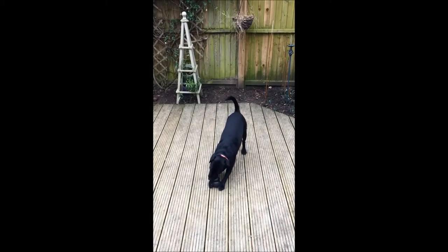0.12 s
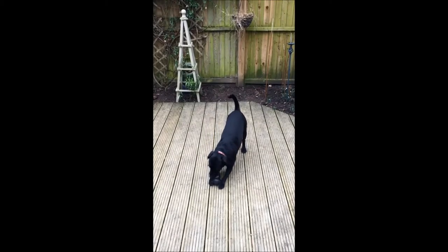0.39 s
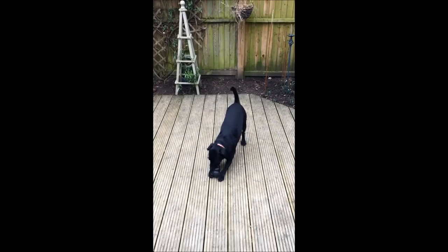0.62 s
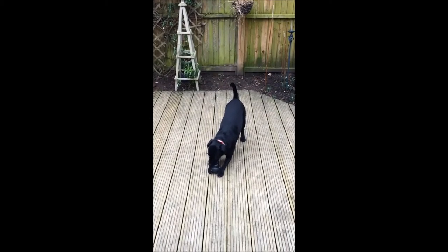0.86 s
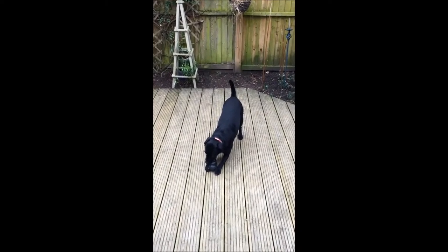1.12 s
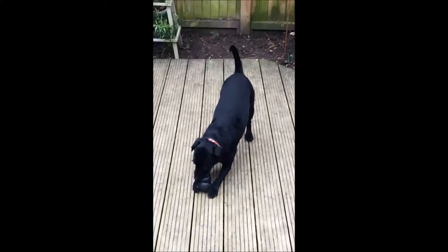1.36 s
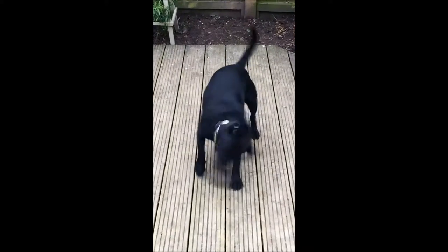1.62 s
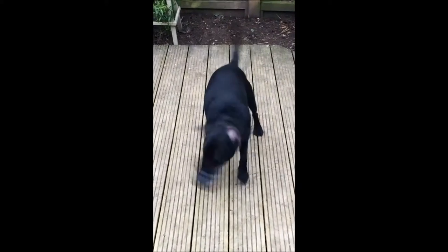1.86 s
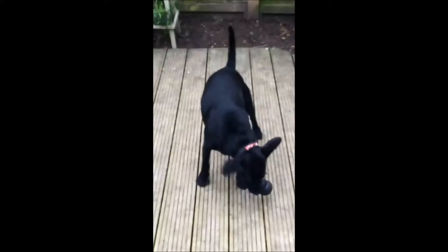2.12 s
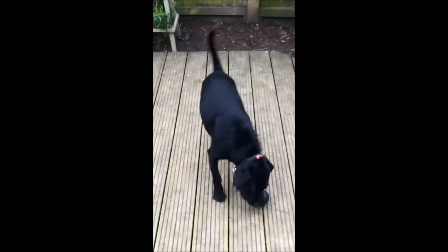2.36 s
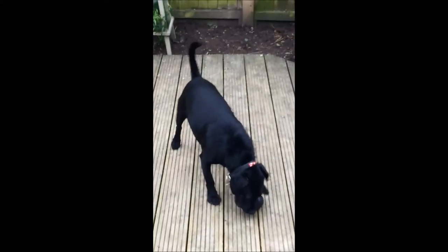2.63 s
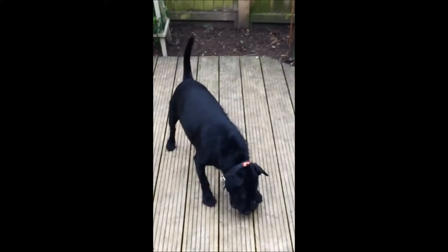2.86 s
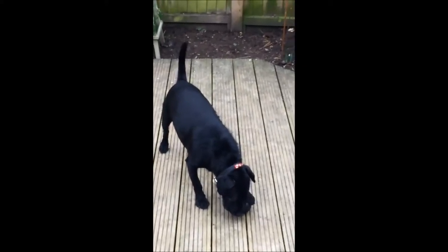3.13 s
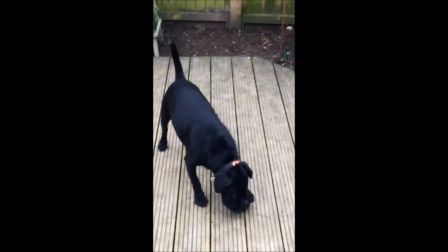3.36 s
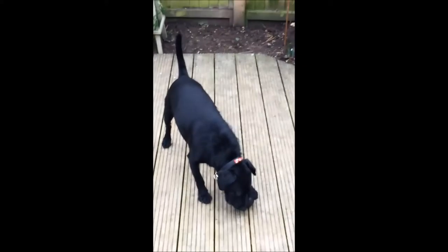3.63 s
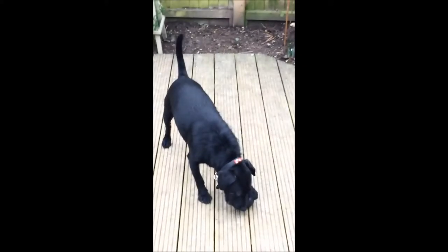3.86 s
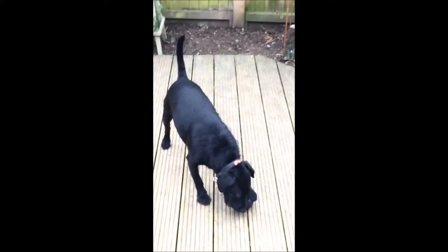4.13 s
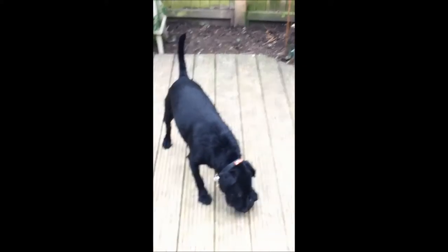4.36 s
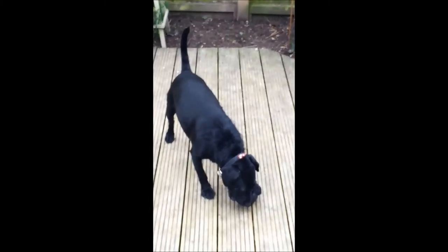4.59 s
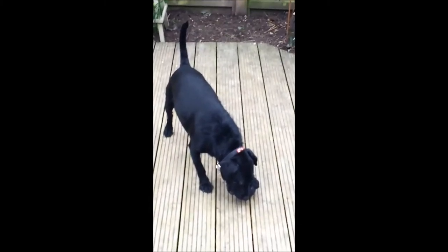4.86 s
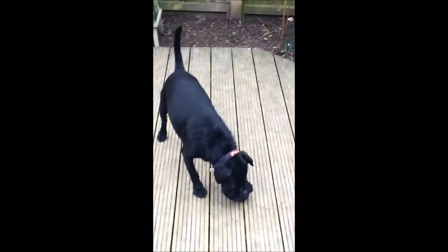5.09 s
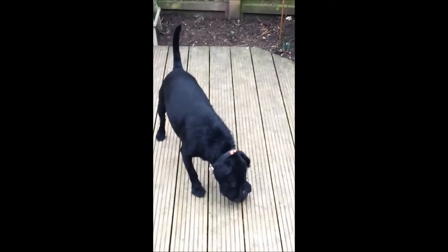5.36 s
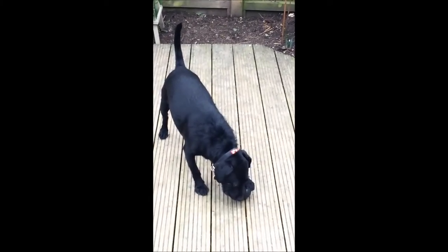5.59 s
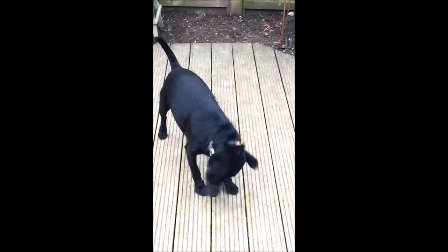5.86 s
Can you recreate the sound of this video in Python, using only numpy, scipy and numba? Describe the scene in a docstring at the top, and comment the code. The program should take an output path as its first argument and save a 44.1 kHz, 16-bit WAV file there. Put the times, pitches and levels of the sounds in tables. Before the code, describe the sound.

Outdoors, a few metres from a phone, a dog gives a quiet fluttering growl, then pauses. It shakes a toy with louder, rougher growls, rustling fur, thin tag jingle and sharp knocks on wooden boards. After a pause come two softer rattling growls, the last swelling into a harsh snarl at the end. Faint town rumble and tiny bird chirps lie underneath.

```python
"""Dog growling over a toy

A dog growls in bouts over a rubber toy on a garden deck, a few metres from a phone, and shakes it.
Uneven fold pulses and breath noise ring chest, throat, mouth and nose; a slow flutter chops them at times.
Decaying modes make the tags' jingle and board knocks; shaped noise makes fur rustle, rasps and far town
rumble; gliding tones make a short whine and small bird calls."""
import sys
import numpy as np
from scipy import signal
from scipy.fft import rfft, irfft
from scipy.io import wavfile
from scipy.ndimage import uniform_filter1d
from numba import njit

SR = 44100
rng = np.random.default_rng(int(sys.argv[2]) if len(sys.argv) > 2 else 0)


def inscribe(sig):
    """Save sig as 16-bit PCM at rate SR to the path in sys.argv[1].

    A 1-D sig is mono; a 2-D sig holds one channel per row.
    Samples are clipped to [-1, 1] before scaling.
    """
    pcm = np.round(np.clip(np.atleast_2d(sig).T, -1, 1) * 32767)
    wavfile.write(sys.argv[1], SR, pcm.astype(np.int16))


def field_ratio(decibels):
    """Amplitude ratio for a level in dB (20 dB per decade); scalars and array-likes work."""
    return 10 ** (np.asarray(decibels, dtype=float) / 20)


N = 263718
T = np.arange(N) / SR


def level(x, db):
    """Scale to an rms level."""
    return x * field_ratio(db) / np.sqrt(np.mean(x ** 2))


@njit
def svf(x, hz, width_hz):
    """State-variable band-pass with a moving centre, gain 1 there."""
    y, band_state, low_state = np.empty(len(x)), 0., 0.
    for i in range(len(x)):
        g, damping = np.tan(np.pi * hz[i] / SR), width_hz / hz[i]
        v = (band_state + g * (x[i] + 1e-18 - low_state)) / (1 + g * (g + damping))
        band_state = 2 * v - band_state
        low_state += 2 * g * v
        y[i] = damping * v
    return y


def resonance(x, hz, width_hz):
    """Band-pass with a fixed centre."""
    return svf(x, hz + 0. * T, 1. * width_hz)


def ring(x, peaks):
    """Sum of resonances with alternating sign, which keeps the valleys between them filled evenly."""
    return sum((-1) ** k * field_ratio(db) * resonance(x, hz, width_hz) for k, (hz, width_hz, db) in enumerate(peaks))


def band(x, lo_hz, hi_hz):
    """Steep band-pass."""
    return signal.sosfilt(signal.butter(3, [lo_hz, hi_hz], "bandpass", fs=SR, output="sos"), x)


def decay(x, decay_s):
    """Each impulse dies away exponentially with time constant decay_s."""
    return signal.lfilter([1], [1, -np.exp(-1 / (decay_s * SR))], x)


def clicks(seconds, sizes):
    """One-sample impulses at the given times."""
    return np.bincount((np.asarray(seconds) * SR).astype(int), sizes, N)[:N]


def walk(rate_hz):
    """Random levels held 1 / rate_hz s and slewed twice; spread about 2.3."""
    k = int(SR / rate_hz)
    steps = np.repeat(rng.standard_normal(N // k + 1), k)
    return 3.2 * uniform_filter1d(uniform_filter1d(steps, k), k)[:N]


def track(tables, silent_db=-110):
    """Columns of several bouts on the sample grid; the first is a level, silent between bouts."""
    s, *columns = np.concatenate(tables).T
    columns = [np.interp(T, s, c) for c in columns]
    sounding = sum((T >= rows[0][0]) & (T <= rows[-1][0]) for rows in tables) > 0
    return [np.where(sounding, columns[0], silent_db)] + columns[1:]


def strike(seconds, db, modes, rise_s):
    """Each onset rings the decaying modes with its own small changes of strength."""
    out = np.zeros(N)
    share = field_ratio(2.2 * rng.standard_normal((len(seconds), len(modes))))
    t = T[:SR // 3]
    for (hz, mode_db, t60_s), part in zip(modes, share.T):
        envelope = np.exp(-np.log(1000) * t / t60_s) * (1 - np.exp(-t / rise_s))
        tone = field_ratio(mode_db) * np.sin(2 * np.pi * hz * t) * envelope
        out += signal.fftconvolve(clicks(seconds, field_ratio(db) * part), tone)[:N]
    return out


def crack(seconds, db, hz, width_hz, decay_s):
    """A short burst of band noise at each onset."""
    noise = level(resonance(rng.standard_normal(N), hz, width_hz), 0)
    return decay(clicks(seconds, field_ratio(db)), decay_s) * noise


def swells(rows):
    """Each envelope rises fast to its level at s, holds and dies away."""
    rise_db_s, fall_db_s = 1495, 548.5
    out = np.zeros(N)
    for s, hold_s, db in rows:
        out += field_ratio(db - rise_db_s * np.clip(s - T, 0, 1) - fall_db_s * np.clip(T - s - hold_s, 0, 1))
    return out


def glides(rows):
    """Short tones that slide from one pitch to another under a half-sine root envelope."""
    out = np.zeros(N)
    for s, length_s, start_hz, end_hz, db in rows:
        u = np.clip((T - s) / length_s, 0, 1)
        phase = 2 * np.pi * np.cumsum(start_hz + (end_hz - start_hz) * u) / SR
        out += field_ratio(db) * np.sqrt(np.sin(np.pi * u) + 1e-12) * np.sin(phase)
    return out


def echoes(x, t60_s):
    """A tail of scattered reflections with unit energy, from 6 ms on."""
    t = T[:int(t60_s * SR)]
    tail = rng.standard_normal(len(t)) * np.exp(-np.log(1000) * t / t60_s) * (t > .006)
    return signal.fftconvolve(x, tail / np.sqrt(np.sum(tail ** 2)))[:N]


def town():
    """Far traffic and air: coloured noise whose bass wavers, and a low engine drone of narrow noise."""
    # noise colour: f/Hz, relative density/dB
    colour_rows = [(15, -35.5), (25, -13.5), (79, -5.5), (160, -19.5), (495, -30), (648, -30.5),
                   (945, -30.5), (1020, -31.5), (2170, -38), (15500, -51)]
    # far engine drone: f/Hz, first filter width/Hz, level/dB
    hum_hz, width_hz, hum_db = (75, 18, -59)
    hz, db = np.transpose(colour_rows)
    bins = np.maximum(np.fft.rfftfreq(N, 1 / SR), 1)
    colour = field_ratio(np.interp(np.log(bins), np.log(hz), db)) * rfft(rng.standard_normal(N))
    bass = irfft(colour * (bins < 130), N) * field_ratio(1.5 * walk(35))
    rest = irfft(colour * (bins >= 130), N) * field_ratio(0.3 * walk(1.0))
    drone = ring(rng.standard_normal(N), [(hum_hz, width_hz, 0)])
    drone = level(ring(drone, [(hum_hz, 3 * width_hz, 0)]), hum_db)
    return level(bass + rest, -57.8) + drone


def birds():
    """Gliding whistles, broken up by leaves and smeared by echoes from fences and trees."""
    # notes: t/s, length/s, start f/Hz, end f/Hz, relative level/dB
    notes = [(1.146, 0.016, 4770, 5580, -59), (1.158, 0.023, 5490, 3600, -56),
             (1.204, 0.021, 3760, 3650, -58), (1.228, .014, 3600, 3020, -61),
             (3.529, 0.046, 4850, 5150, -63), (4.065, 0.023, 6270, 4790, -71.5),
             (4.09, 0.048, 4850, 2740, -67), (4.43, .11, 503, 510, -68.5), (4.438, 0.051, 5540, 5760, -66),
             (4.526, 0.035, 3820, 3640, -70), (4.554, 0.042, 5140, 6180, -62.5),
             (4.6, .02, 3700, 3630, -77.5), (4.638, 0.028, 3550, 4960, -63.5),
             (4.668, 0.03, 4950, 5000, -70)]
    out = glides(notes) * field_ratio(2.0 * walk(300))
    return field_ratio(-10) * out + field_ratio(-5) * echoes(out, 0.3)


def rustle():
    """Fur, ears and collar moving: broad noise that flickers, with scattered fine ticks."""
    # movements: t/s at full level, hold/s, level/dB
    moves = [(0, 0.64, -71.5), (0.14, 0.0027, -51), (0.746, 0.013, -72.5), (1.53, 0.12, -49.5),
             (1.65, 0.22, -51.5), (1.656, 0.039, -47.5), (1.832, .004, -45), (2.005, 0.051, -48),
             (2.11, .29, -52.5), (2.018, 0.0048, -41), (2.082, 0.0053, -52), (2.36, 0.017, -47.5),
             (2.661, 0.03, -63), (5.25, 0.62, -71.5), (5.785, 0.04, -61), (5.82, 0.18, -58),
             (5.96, .03, -62)]
    # noise colour: f/Hz, width/Hz, relative gain/dB
    fur = [(1504, 2100, 6), (4960, 28000, -3), (11560, 3700, -1.5)]
    ticks = field_ratio(1.5 * rng.exponential(size=N)) * (rng.random(N) < .03) * rng.standard_normal(N)
    grain = rng.standard_normal(N) + 0.2 * level(ticks, 0)
    return swells(moves) * level(ring(grain * field_ratio(2.17 * walk(28.97)), fur), 0)


def knocks():
    """Toy and claws on the boards: dull short modes with a sharp noise edge."""
    # blows: t/s, relative mode level/dB, relative edge level/dB
    blows = [(1.639, -32, -55), (1.705, -9.5, -28.5), (1.739, -21, -44), (2.091, -25, -31),
             (2.139, -24, -59), (2.187, -25.5, -42.5), (2.46, -35, -49.5), (2.672, -45, -57.5),
             (4.838, -55, -56), (5.883, -47, -37)]
    # board modes: f/Hz, relative level/dB, t60/s
    boards = [(314.7, -16, 0.035), (750, 3.5, 0.017), (1680, 5.5, 0.0056), (2680, -5.5, 0.01)]
    s, mode_db, edge_db = np.transpose(blows)
    return strike(s, mode_db - 6.5, boards, 0.00022) + crack(s, edge_db - 5.0, 3500, 5000., 0.0044)


def tags():
    """Thin short metallic rings and a tick, mostly the jingle of metal tags."""
    # onsets, some very faint: t/s, relative low ring/dB, relative high ring/dB, relative tick/dB
    onsets = [(0.143, -44, -60, -80), (1.5308, -55, -73, -63), (1.6264, -51, -61, -62),
              (1.667, -51, -69, -66), (1.6872, -40, -64, -57), (1.701, -38, -65, -62),
              (1.722, -47, -66.5, -68), (1.79, -42, -55, -36.5), (1.833, -39, -50, -55),
              (1.8364, -9.5, -18, -23), (1.853, -22.5, -29, -36), (1.877, -26.5, -38, -44),
              (1.8944, -20.5, -40, -40), (1.924, -55, -62, -55), (2.003, -39, -47, -52),
              (2.0244, -25.5, -46, -37), (2.0456, -31.5, -42, -47.5), (2.0923, -42, -55.5, -67),
              (2.131, -52, -55, -66.5), (2.252, -41, -47, -58), (5.956, -52, -50, -58),
              (5.965, -40, -40, -60)]
    # metal modes, three groups: f/Hz, relative level/dB, t60/s
    low = [(6897, 0, .036), (6905, -13, .1), (7040, -15, .03), (7133, -18, .05)]
    high = [(15104, 0, .045), (14895, -8, .045), (15190, -8, .04)]
    edge = [(8812, 0, .02), (9491, -1, .02), (10430, 0, .02)]
    s, low_db, high_db, edge_db = np.transpose(onsets)
    rings = strike(s, low_db + 3.5, low, 0.0029) + strike(s, high_db + 1.5, high, 0.0016)
    rings += strike(s, edge_db - 7.5, edge, .0003)
    return rings + crack(s, edge_db + 8.5, 9700, 15000.0, 0.0016)


def rasp():
    """Air rasping past teeth and toy: flickering noise in narrow gaps."""
    # rasps: t/s at full level, hold/s, level/dB
    gusts = [(5.756, 0.0057, -69), (5.786, 0.014, -66), (5.82, 0.012, -57), (5.856, .012, -63),
             (5.882, 0.0065, -68), (5.902, .008, -64), (5.93, 0.012, -58)]
    # gap resonances: f/Hz, width/Hz, relative gain/dB
    teeth = [(4130, 340, -2), (6150, 240, 2.5), (7500, 770, 2), (8400, 520, -6)]
    return swells(gusts) * level(ring(rng.standard_normal(N) * field_ratio(1.9 * walk(150)), teeth), 0)


def whine():
    """A short clear gliding tone as the head swings."""
    # whines: t/s, length/s, start f/Hz, end f/Hz, level/dB
    notes = [(1.915, 0.026, 784, 973, -30)]
    return glides(notes)


def chop_depth():
    """How deep the flutter chops, 0-1."""
    # t/s, depth/0-1
    chop = [(0, .65), (.5, .65), (.57, .4), (.7, .4), (1.5, .5), (2.6, .5), (3.05, .95), (3.3, .9),
            (3.335, .3), (3.62, .35), (3.68, .85), (3.98, .7), (5.15, .9), (5.7, .9), (5.75, .4),
            (5.8, .35)]
    return np.clip(np.interp(T, *np.transpose(chop)), 0, 1)


def flutter(depth):
    """Once a beat the throat slaps open: slaps, voice that shuts before the next, air puff ahead of it."""
    # per bout: t/s, beat rate/Hz, puff lead/share of a beat
    beats = [
        [(.225, 24, .22), (.475, 24, .22), (.49, 19, .22), (.64, 19, .22)],
        [(3.072, 27, .42), (3.28, 26.3, .43), (3.36, 22, .51), (3.7, 19.2, .59), (3.95, 19, .59)],
        [(5.176, 27.42, .34), (5.8, 27.42, .34)],
    ]
    slaps, fade, puff = np.zeros(N), np.ones(N), np.ones(N)
    for rows in beats:
        s, rate_hz, lead = np.transpose(rows)
        on = (T >= s[0]) & (T < s[-1])
        count = np.cumsum(on * np.interp(T, s, rate_hz)) / SR
        times = np.interp(np.arange(int(count[-1]) + 1), count[on], T[on])
        slaps += clicks(times, field_ratio(0.5 * rng.standard_normal(len(times)))) * depth ** 2
        fade = np.where(on, 1 - depth / (1 + np.exp((.6 - count % 1) / .08)), fade)
        ahead = (count + np.interp(T, s, lead)) % 1
        puff = np.where(on, 1 - depth + 40 * depth * ahead * np.exp(-ahead / .16), puff)
    return slaps, fade, puff


def folds():
    """Irregular vocal-fold pulses, and the gust of air that each lets through; both at rms 1."""
    fold_hz = 88.66  # median pulse rate
    timing, strength = rng.standard_normal((int(1.6 * fold_hz * N / SR), 2)).T
    times = np.cumsum(np.exp(.2 * timing) / fold_hz)
    kept = times < T[-1]
    times, strength = times[kept], strength[kept]
    pulses = level(clicks(times, field_ratio(2.5 * strength)), 0)
    gusts = level(decay(clicks(times, field_ratio(3.2 * strength)), .006), 0)
    return pulses, gusts


def posture():
    """How the head is held: stepped settings smoothed over 25 ms, four resonances drifting slightly."""
    # held until the next row: t/s, chest/dB, belly/dB, chest f/Hz, throat f/Hz, low nose f/Hz,
    # high nose f/Hz, breath share/0-1 (all f before drift, levels relative)
    poses = [(0, 4.5, -2, 205, 577, 1820, 2390, 0.06), (.2, -1.5, -7.5, 229, 566, 1785, 2760, 0.08),
             (0.341, -4, -2.5, 230, 603, 1980, 2550, 0.7), (.39, 0, -8, 235, 584, 1780, 2060, 0.6),
             (.46, -1.5, -6, 236, 680, 1800, 2100, 0.93), (0.529, -6.5, -2, 235, 630, 1900, 2380, 0.98),
             (1.5, 3, -14, 210, 655, 1590, 3050, 0.42), (1.665, 2, -13, 217, 630, 1660, 3340, 0.47),
             (1.71, 5, -15.5, 223, 740, 1550, 2280, 0.16), (1.757, -3.5, -15, 213, 590, 2270, 2900, 0.55),
             (1.785, 0, -9.5, 210, 690, 1670, 2680, 0.24), (1.82, 0, -10, 200, 676, 1720, 2770, 0.17),
             (1.86, 4.5, -4, 201, 610, 1970, 2400, 0.05), (1.93, -1, -10, 204, 555, 2180, 2550, 0.63),
             (1.985, 0.5, -8, 215, 554, 1800, 2580, 0.29), (2.07, 0.5, -5, 225, 610, 1935, 2300, 0.06),
             (2.13, 0.5, -5, 212, 595, 1930, 2330, 0.18), (2.22, -2.5, -0.5, 217, 550, 1900, 2365, 0.25),
             (2.275, -3, -5, 210, 640, 1980, 2400, 0), (2.31, -11, 3, 212, 566, 1900, 2430, 0.12),
             (2.35, -4, 1, 212, 660, 1895, 2450, 0.36), (2.739, -2.5, -2.5, 187, 704, 1882, 2630, 1),
             (3.051, -1, -9, 241, 638, 2007, 2670, 0.53), (3.3, 1.5, -9, 250, 650, 1940, 2544, 0.37),
             (3.35, 4.5, -10, 260, 652, 1665, 2170, 0.05), (3.455, 6, -8.5, 263, 655, 1750, 2480, 0.11),
             (3.5, 2, -11, 257, 645, 1886, 2705, 0.1), (3.62, 1.5, -6.5, 246, 656, 1896, 2680, 0.67),
             (5.101, -2.5, -4.5, 241, 640, 2016, 2464, 0.62), (5.78, 3, -15, 194, 744, 1720, 2500, 0.19),
             (5.82, 2.5, -18.5, 208, 720, 2150, 2500, 0.19), (5.855, -1, -8, 201, 733, 1620, 2000, 0.26),
             (5.91, 1.5, -15, 202, 783, 1660, 2520, 0.25)]
    start, *held = np.transpose(poses)
    now = np.clip(np.searchsorted(start, T) - 1, 0, None)
    chest_db, belly_db, *centres_hz, share = [uniform_filter1d(c[now], size=SR // 40) for c in held]
    centres_hz = [hz * (1 + 0.005 * walk(12)) for hz in centres_hz]
    return chest_db, belly_db, centres_hz, np.clip(share, 0, 1)


def chest(voice, chest_db, belly_db, chest_hz):
    """Low body resonances of the voice."""
    body = svf(voice, chest_hz, 30.0) - field_ratio(belly_db) * resonance(voice, 135, 120)
    body = body - field_ratio(-0.5) * resonance(voice, 280, 33)
    return field_ratio(chest_db) * band(body, 57, 288)


def throat(voice, blows, throat_hz, mouth_hz, mouth_db):
    """Throat and mouth resonances, plus the one-cycle thud of each blow."""
    # fixed resonances: f/Hz, width/Hz, relative gain/dB
    fixed = [(453, 68, 0.5), (792.8, 41, 9)]
    tube = sum(field_ratio(db) * resonance(voice, hz, width_hz) for hz, width_hz, db in fixed)
    tube = tube - field_ratio(10.5) * svf(voice, throat_hz, 85.0) - field_ratio(mouth_db) * svf(voice, mouth_hz, 75.0)
    thud = resonance(resonance(voice + 4 * blows, 680, 640), 680, 640)
    thud = signal.sosfilt(signal.butter(3, 1200, fs=SR, output="sos"), thud)
    return band(tube, 300, 1500) + field_ratio(-8) * thud  # band leaves dark valleys on both sides


def nose(nasal, low_hz, high_hz, nose_db):
    """Nasal resonances of torn air and a little voice."""
    # fixed resonances: f/Hz, width/Hz, relative gain/dB
    nostrils = [(1550, 180, 2), (2150, 510, -3), (2900, 210, -3)]
    out = field_ratio(1.5) * svf(nasal, low_hz, 70.0) - field_ratio(3.5) * svf(nasal, high_hz, 80.)
    return field_ratio(nose_db) * band(out + field_ratio(-5.5) * ring(nasal, nostrils), 1400, 3299)


def breath(flow, breath_db):
    """High hiss: puffed air noise through broad resonances."""
    # f/Hz, width/Hz, relative gain/dB
    hiss = [(3650, 240, -1), (3050, 200, -5), (4400, 300, -5.5), (6450, 770, -9.5), (8500, 2500, -20),
            (11800, 300, -14), (13450, 2400, -18.5)]
    return field_ratio(breath_db) * ring(flow, hiss)


def dog():
    """Fold pulses, slaps, snaps and breath noise drive chest, throat, mouth and nose resonances."""
    # per bout: t/s, relative voice level/dB, relative airflow level/dB, mouth f/Hz
    bouts = [
        [(0, -66.5, -51.5, 1106), (.058, -57.5, -60.5, 1080), (.108, -42.5, -50, 1130),
         (.14, -45.5, -65.5, 1200), (.208, -46, -59, 915), (.226, -35.5, -54, 1000), (.27, -42.5, -51.5, 1090),
         (.298, -40.5, -55.5, 1060), (.356, -41, -51, 1084), (.428, -49, -59, 1020), (.478, -43, -62, 950),
         (.535, -53, -52.5, 990), (.565, -56.5, -56, 1040), (.61, -57, -50.5, 1090), (.66, -77, -73.5, 1110),
         (.72, -79, -90, 1110)],
        [(1.5, -66.5, -76, 905), (1.558, -56.5, -57, 1110), (1.618, -75, -84, 950), (1.636, -42.5, -70, 990),
         (1.69, -56.5, -39.5, 1010), (1.72, -33.5, -45, 1010), (1.775, -31, -36, 1136), (1.83, -41.5, -54, 860),
         (1.87, -38, -66, 730), (1.915, -35, -57, 798), (1.94, -39, -49, 970), (1.985, -29, -51, 1013),
         (2.04, -41.5, -62, 890), (2.065, -40, -61, 900), (2.08, -41, -45, 1050), (2.11, -31, -49.5, 1070),
         (2.17, -38.5, -59, 1110), (2.25, -31, -49, 1164), (2.31, -32.5, -52.5, 1250), (2.33, -29, -51.5, 1270),
         (2.39, -39, -49, 1270), (2.44, -56, -63, 1110), (2.49, -67.5, -60, 1004), (2.6, -77.5, -71, 1030)],
        [(2.74, -78, -81, 953), (2.788, -65, -80, 898), (2.818, -85.5, -90.5, 998), (2.874, -69, -60, 1116),
         (2.974, -61, -55.5, 1170), (3.052, -75.5, -70.5, 1086), (3.074, -54.5, -67.5, 978),
         (3.134, -53.5, -68, 939), (3.142, -47.5, -60.5, 990), (3.306, -42.5, -54, 1000),
         (3.366, -44, -65, 930), (3.44, -41, -64.5, 932), (3.534, -41, -59.5, 936), (3.702, -52.5, -58.5, 945),
         (3.948, -53, -57.5, 1011), (4.01, -71, -66.5, 1050), (4.05, -73, -80.5, 1060)],
        [(5.1, -75, -88, 1110), (5.15, -67, -76.5, 1066), (5.21, -42, -61, 1000), (5.29, -43, -51, 1060),
         (5.4, -44, -50, 1067), (5.6, -43, -55.5, 1028), (5.69, -41, -56.5, 1026), (5.735, -47.5, -56.5, 980),
         (5.76, -40, -52, 947), (5.782, -39, -56, 950), (5.8, -31.5, -55.5, 1010), (5.85, -29, -52.5, 916),
         (5.89, -32.5, -59.5, 850), (5.94, -26, -50, 860), (5.98, -32, -55, 845)],
    ]
    # hard snaps, some falling on flutter slaps and making them stronger: t/s, relative level/dB
    snaps = [(0.112, -39), (0.223, -61), (0.278, -36), (0.315, -41), (0.353, -32), (0.389, -45),
             (0.475, -42), (1.72, -17.5), (1.743, -19), (1.926, -29), (2.104, -23), (2.153, -20.5),
             (2.24, -27), (2.269, -35), (2.318, -27), (2.285, -20), (2.35, -28), (3.258, -30.5),
             (3.296, -34), (3.341, -28.5), (3.355, -31.5), (3.385, -33), (3.399, -35.5), (3.429, -30.5),
             (3.448, -37.5), (3.539, -35), (3.57, -37.5), (3.619, -36), (5.213, -33.5), (5.284, -26),
             (5.842, -20), (5.865, -21), (5.905, -24), (5.922, -28)]
    db, air_db, mouth_hz = track(bouts)
    chest_db, belly_db, (chest_hz, throat_hz, low_hz, high_hz), share = posture()
    nose_db = np.where(db > -110, air_db - db, 0)  # airflow over voice
    depth = chop_depth()
    pulses, gusts = folds()
    pulses = pulses * (1 - 0.77 * depth)  # a deep flutter weakens the fold pulses
    slaps, fade, puff = flutter(depth)
    air = rng.standard_normal(N) * field_ratio(0.89 * walk(60))
    gain = field_ratio(db + 0.5)
    s, snap_db = np.transpose(snaps)
    blows = gain * field_ratio(28.0) * slaps + clicks(s, field_ratio(snap_db + 11.5))
    voice = gain * fade * (np.sqrt(1 - share) * pulses + np.sqrt(share) * air) + blows
    puff = puff + 1.1 * decay(clicks(s - .003, np.ones(len(s))), 0.013)  # each snap lets out air
    torn = air * (.6 + .4 * gusts)
    nasal = 0.022 * voice + gain * puff ** 0.6 * torn
    out = field_ratio(13.0) * throat(voice, blows, throat_hz, mouth_hz, 12.5 + 0.66 * nose_db)
    out += field_ratio(25.5) * chest(voice, chest_db, belly_db, chest_hz)
    out += field_ratio(13.5) * nose(nasal, low_hz, high_hz, nose_db)
    return out + field_ratio(11.0) * breath(gain * puff * air, nose_db - 12)


def scene():
    """Near sounds with the fence's short echo, weaker for the thin treble of the tags, over birds and town."""
    background = town() + birds()
    near = rustle() + knocks() + rasp() + whine() + dog()
    jingle = tags()
    echo = echoes(field_ratio(-8) * near + field_ratio(-20) * jingle, 0.11)
    return (background + near + jingle + echo)[None]


def low_pass(x):
    """Removes everything above the highest recorded frequency."""
    return signal.sosfilt(signal.butter(12, 16180, fs=SR, output="sos"), x)


def record(dry):
    """The phone cuts the top: steep low-pass at 15250 Hz."""
    cut = signal.sosfilt(signal.ellip(8, .2, 55, 15250, fs=SR, output="sos"), dry)
    return low_pass(cut)


dry = scene()
out = record(dry)
inscribe(out)
```